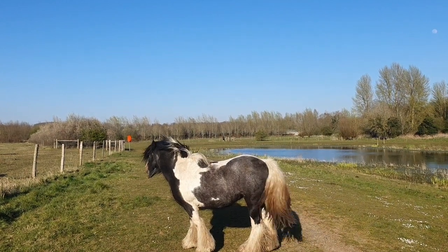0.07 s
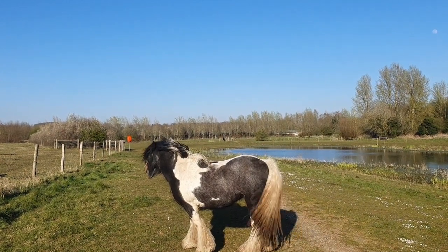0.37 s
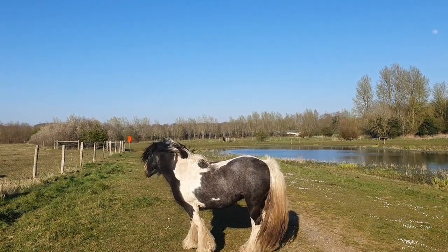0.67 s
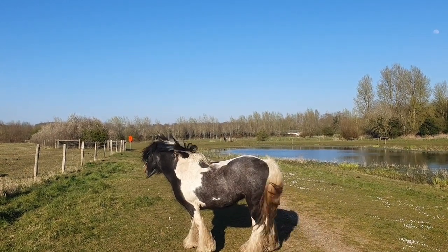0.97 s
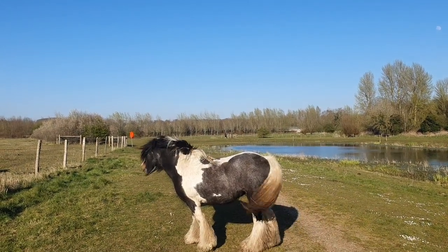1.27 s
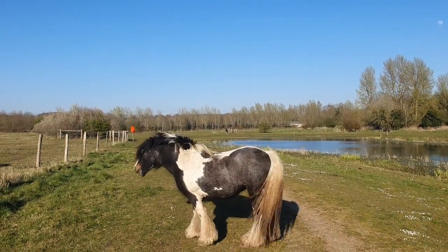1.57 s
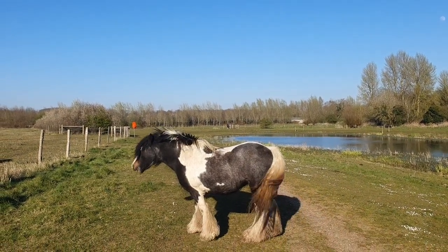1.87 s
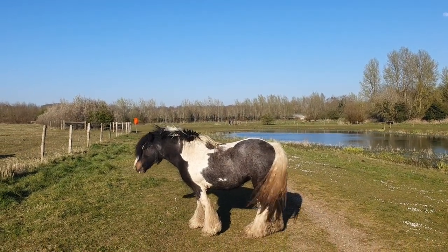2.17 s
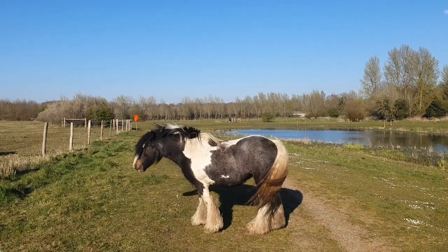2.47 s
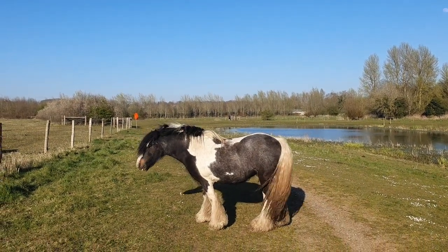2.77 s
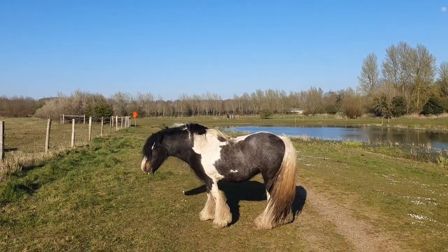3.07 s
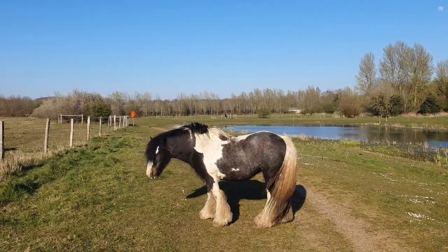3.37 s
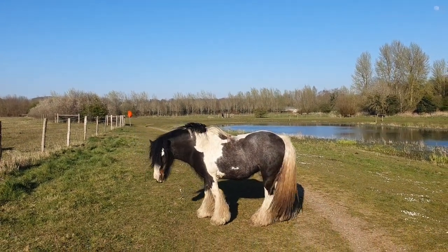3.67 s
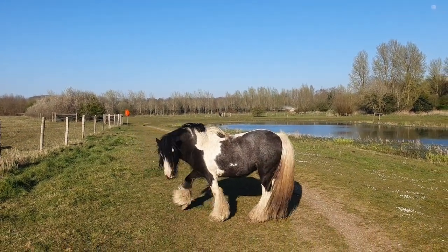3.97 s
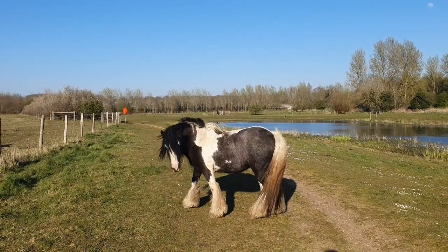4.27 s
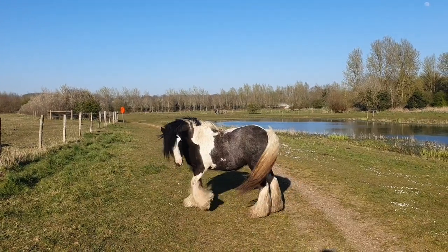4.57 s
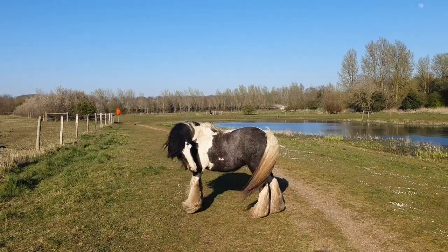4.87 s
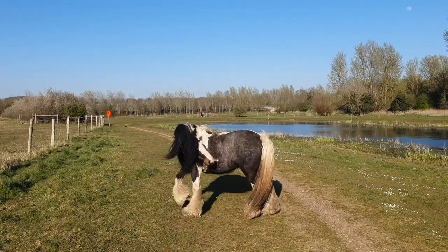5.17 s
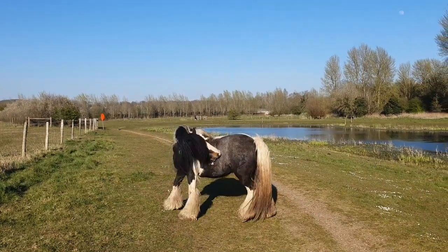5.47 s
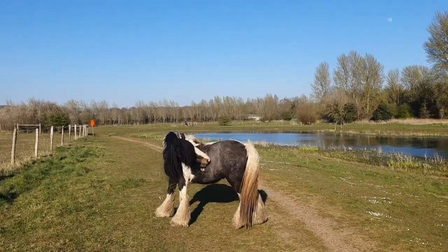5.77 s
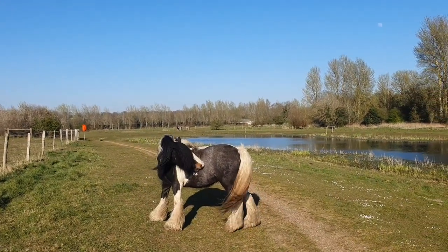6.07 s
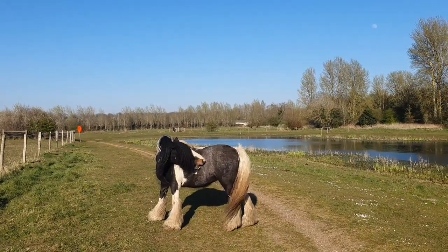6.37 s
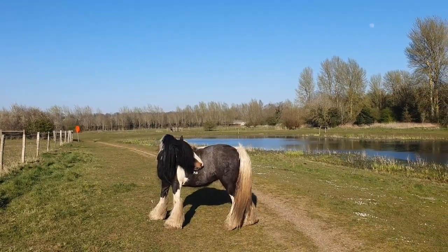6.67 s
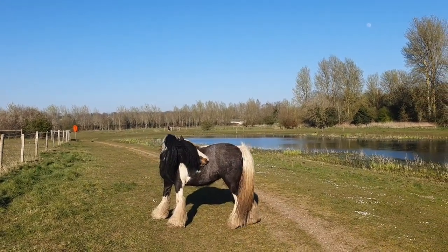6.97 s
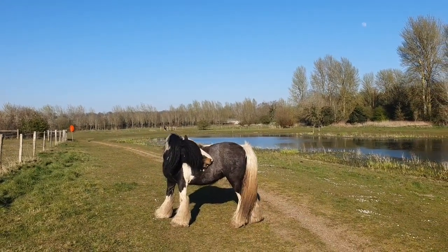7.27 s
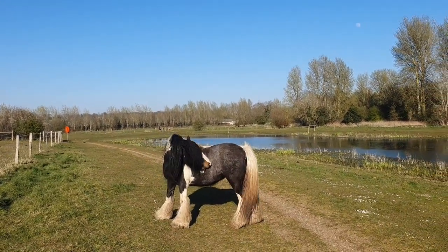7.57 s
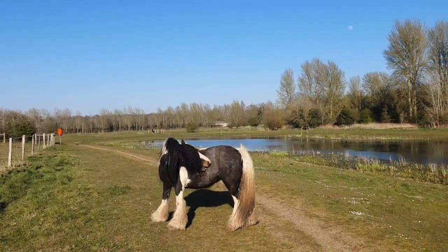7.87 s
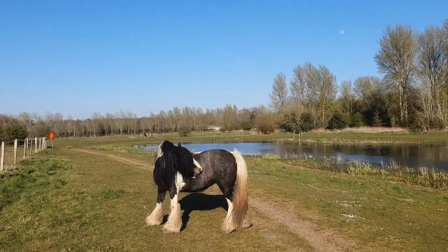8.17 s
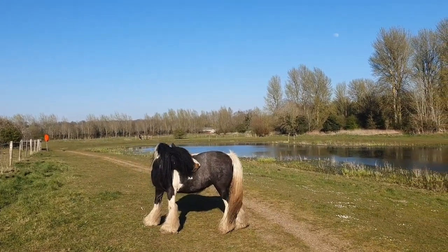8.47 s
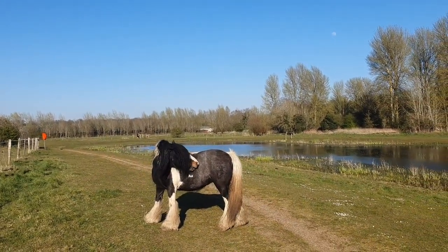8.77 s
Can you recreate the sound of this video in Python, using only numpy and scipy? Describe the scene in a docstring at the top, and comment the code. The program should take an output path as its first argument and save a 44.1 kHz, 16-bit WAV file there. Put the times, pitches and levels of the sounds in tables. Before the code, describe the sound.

Outdoors in an open field, a horse starts at once with two short nasal grunts under a wavering high cry. By 0.3 seconds it leaps to a thin, whistling squeal, then drops to a short rasp just before 1 second. Wind immediately hits the hand-held microphone with a cluster of loud thumps. Uneven gusts keep rumbling and flapping until about 7 seconds, with strong buffets near 1.9 and 5.4 seconds and a few dull crackles between 5 and 7 seconds. Far off, a small bird sings very faint runs of falling notes at the start and around 2.8, 3.7 and 6.4 seconds; another peeps near 3.3 and 8.4 seconds. The wind dies away by about 7.7 seconds. From there to the end at around 9 seconds, soft ticks and a light grass rustle sound close underfoot over the quiet hush of the field.

```python
"""Horse squeal and wind by a pond

On a path by a pond a horse grunts, breaks into a thin high squeal and drops back to a short rasp. Then gusts
ride on a breeze and buffet each port of the hand-held microphone; the hardest crackle. Far off a small bird
sings runs of falling notes, some closing on short steady low notes. Close by, grass rustles and ticks underfoot
over a quiet field."""
import sys
import numpy as np
from scipy import signal
from scipy.fft import rfft, irfft, next_fast_len
from scipy.io import wavfile
from scipy.ndimage import uniform_filter1d, map_coordinates

SR = 44100
rng = np.random.default_rng(int(sys.argv[2]) if len(sys.argv) > 2 else 0)


def bounce(signal):
    """Save signal as a 16-bit WAV file at the path given by the first command-line argument."""
    frames = np.transpose(np.atleast_2d(signal))
    limited = np.clip(frames, -1, 1)
    pcm = np.round(limited * 32767).astype(np.int16)
    wavfile.write(sys.argv[1], SR, pcm)


N = 397341
TIME = np.arange(N) / SR

# noise spectra of hollow roar, tearing air, dull knocks and dry grass: [f/Hz, relative level/dB]
ROAR_COLOUR = [(90, -16.5), (190, -4.5), (380, 1.5), (620, -5.5), (900, -25.5), (1800, -60.5)]
TEAR_COLOUR = [(450, 11.5), (850, 14.5), (1300, 2), (2000, -8.5), (3200, -21.5), (7500, -33),
               (10000, -58.5)]
KNOCK_COLOUR = [(1200, 9), (3000, -8), (7500, -35)]
GRASS_COLOUR = [(2900, -4.5), (3900, 3), (5000, -4.5), (13500, -8.5)]


def horse(lag_s=.00009, right_db=-1.5):
    """The horse's call reaches the left port a little sooner; ground and trees add a faint tail."""
    voice = grunt() + squeal()
    right = undb(right_db) * np.interp(TIME - lag_s, TIME, voice)
    return np.array([voice, right]) + outdoors(voice, echo_db=-20)


def squeal(overtone_db=-28, hiss_db=-10.5, leak_db=-19, flicker_db=6, linger_s=.058):
    """A high voice arches, then leaps to a whistle; where it sags the folds slacken and turn hoarse."""
    # pitch of the squeal: [t/s, f/Hz]
    melody = [(0.0, 1100), (0.04, 1380), (0.09, 790), (0.148, 1380), (0.2, 840), (0.23, 1380),
              (0.256, 2330), (0.285, 2730), (0.325, 2490), (0.365, 2600), (0.415, 2410), (0.484, 2375),
              (0.5, 2430), (0.526, 2400), (0.538, 2265), (0.572, 2260), (0.586, 2410), (0.62, 2480),
              (0.652, 2300), (0.692, 2340), (0.706, 2545), (0.748, 2460), (0.768, 2260), (0.798, 1600),
              (0.83, 2280), (0.852, 2350), (0.862, 2540), (0.884, 2500), (0.9, 2280), (0.922, 1560),
              (0.94, 1200)]
    # upper resonances of the head: [f/Hz, width/Hz, gain/dB]
    head = [(3940, 480, -5), (5000, 770, 3), (6150, 300, 8), (7180, 320, -2.5)]
    hz = uniform_filter1d(curve(melody), size=220)
    db = whistle_level(hz)
    # slack folds, weak drive and quick jumps (each 0 to 1) unsettle the voice
    slack = np.clip((2240 - hz) / 340, 0, 1)
    slack = np.maximum(slack, uniform_filter1d(slack, size=int(linger_s * SR)))
    weak = np.clip((-35 - db) / 14, 0, 1)
    jump = np.clip(np.abs(np.gradient(hz)) * SR / 24000, 0, 1) ** 2
    jitter = .004 + .02 * np.maximum(slack, np.maximum(weak, jump))
    phase = 2 * np.pi * np.cumsum(hz * (1 + jitter * walk(600))) / SR
    overtones = np.zeros(N)
    for k in range(2, 7):
        strength = undb(overtone_db + flicker_db * np.clip(walk(110), -2, 1)) * (2 / k) ** 2
        overtones += strength * np.sin(k * phase + .5 * walk(900))
    overtones *= undb(np.maximum(23 * slack, 17 * weak))
    hiss = noise([(1500, -11.5), (5500, 4), (9000, -21.5)])[0] * undb(hiss_db) * slack
    # the overtones flare as they glide through the resonances
    ringing = sum(undb(gain) * formant(overtones + hiss, f, width) for f, width, gain in head)
    upper = ringing + hiss / 2 + undb(leak_db) * overtones
    sounding = uniform_filter1d(1. * (TIME < melody[-1][0]), size=256)
    # uneven beats of the folds chop the whistle into a rasp
    chop = undb((3.2 * slack + 2 * weak + jump) * np.clip(walk(700), -2, 2))
    chop = uniform_filter1d(chop / running_rms(chop, SR // 40), size=20)
    shimmer_db = (3 + 4 * np.maximum(weak, jump / 2)) * np.clip(walk(150), -2, 1)
    return np.sqrt(2) * (np.sin(phase) + upper) * chop * undb(db + shimmer_db) * sounding


def whistle_level(hz, peak_hz=2314, peak_db=-22.5, below_hz=110, above_hz=75, start_db=-5, swell_s=.4):
    """Level in dB: the whistle swells in, peaks on its resonance, fades gently below and steeply above."""
    # a brief catch in the voice: [centre t/s, half-width/s, dip/dB]
    catch = (0.61, 0.015, -18.5)
    s, width, dip_db = catch
    dip = dip_db * np.exp(-((TIME - s) / width) ** 2)
    swell = start_db * np.clip(2 - 2 * TIME / swell_s, 0, 1)
    below = np.maximum(peak_hz - hz, 0) / below_hz
    above = np.maximum(hz - peak_hz, 0) / above_hz
    return peak_db + swell + dip - 10 * np.log10(1 + below ** 2) - 20 * np.log10(1 + above ** 2)


def grunt(jitter=.016, rasp=.6, restless_db=3, nose_db=-1):
    """A nasal hum; uneven, hoarse beats of the folds ring the throat."""
    # throat resonances, mouth open: [f/Hz, width/Hz, gain/dB]
    throat = [(744, 140, -3), (1433, 190, -2.5), (2206, 280, -5.5), (5300, 1500, -23)]
    hz, strength = grunt_contour()
    cycles = np.cumsum(hz * (1 + jitter * walk(220))) / SR
    pulses = unit(np.diff(np.floor(cycles), prepend=0) * undb(2 * walk(200)))
    breath = unit(np.exp(-(cycles % 1)) * rng.standard_normal(N))
    beats = pulses + rasp * breath
    mouth = sum(undb(db + restless_db * walk(37)) * formant(beats, f, width) for f, width, db in throat)
    nose = undb(nose_db) * unit(np.sin(2 * np.pi * cycles))
    return unit(nose + unit(mouth)) * strength


def grunt_contour(arch=.098, fullness=.65):
    """Pitch and strength of the low voice: both rise and fall with the effort of each grunt."""
    # grunts as the squeal starts and ends: [t/s, length/s, top f/Hz, level/dB]
    grunts = [(0.0, 0.095, 209.6, -42.5), (0.108, 0.11, 208, -34.5), (0.212, 0.029, 202.6, -31.5),
              (0.912, 0.056, 197.7, -33)]
    hz, strength = np.full(N, grunts[0][2], float), np.zeros(N)
    for s, length, top_hz, db in grunts:
        during = (TIME > s) & (TIME < s + length)
        effort = np.sin(np.pi * (TIME[during] - s) / length) ** fullness
        hz[during] = top_hz * (1 - arch * (1 - effort))
        strength[during] = undb(db) * effort
    return hz, strength


def wind(eddy_db=-15, eddy_growth=.45, calm_db=-65, tear_db=1, crackle_db=3, thinning_db=10):
    """Eddies rumble and flap at each port; the fastest tear into a crackle at the cost of the roar."""
    # spectrum of the rumble: [f/Hz, relative level/dB]
    eddy_colour = [(25, -24.5), (55, -2), (90, -3), (150, -9), (450, -33.5)]
    db, sharpness = wind_force()
    flaps = flapping()
    stirring = undb(eddy_growth * db + eddy_db) / np.hypot(1, undb(calm_db - db))
    rumble = noise(eddy_colour) * unit(flaps ** .5 * flutter(18, 6.15)) * stirring
    body = roar(db) * flaps * undb(db) / np.hypot(1, undb(sharpness + thinning_db))
    tearing = noise(TEAR_COLOUR) * unit(flaps * flutter(400, crackle_db)) * undb(db + sharpness + tear_db)
    return rumble + body + tearing


def wind_force(breeze_db=2, attack_s=.02, sag_db_per_s=10.5, release_s=.023):
    """Level and sharpness of the wind in dB: breeze and gusts add in power; a gust rises fast and sags."""
    # breeze between the gusts: [t/s, level/dB before breeze_db]
    breeze = [(0.93, -62), (1.1, -22.5), (1.45, -43), (1.6, -38), (1.94, -30.5), (3.05, -33.5), (3.3, -28),
              (4.5, -31), (4.8, -36.5), (5.08, -25), (5.5, -27.5), (5.83, -38.5), (6.07, -33), (7.0, -39),
              (7.16, -49.5), (7.66, -50), (7.8, -73), (8.02, -83.5), (8.06, -62)]
    # how much the breeze tears at the ports: [t/s, sharpness/dB relative to its level]
    sharpness = [(1.4, -35), (3.0, -17), (5.7, -18), (7.15, -3.5), (9.0, -27)]
    # gusts: [t/s, length/s, level/dB, sharpness/dB relative to that level]
    gusts = [(0.947, .175, -18, -20.5), (1.235, 0.26, -22, -47), (1.715, 0.15, -20, -22),
             (1.911, 0.046, -18.5, -24), (2.053, 0.17, -22.5, -20.5), (2.358, 0.28, -23, -23.5),
             (2.667, 0.12, -23, -16), (3.101, 0.2, -20.5, -17.5), (3.391, 0.3, -20.5, -15),
             (3.751, 0.87, -26, -11.5), (4.225, 0.21, -20.5, -16), (4.849, 0.19, -21, -24),
             (5.228, 0.1435, -17.5, -14), (5.262, 0.05, -24, -3.5), (5.479, 0.15, -22, -14),
             (5.932, 0.26, -22, -19.5), (6.372, 0.99, -32.5, -12), (6.921, 0.14, -22, -9.5),
             (7.39, 0.15, -32.5, -10)]
    power = undb(curve(breeze) + breeze_db) ** 2
    torn = power * undb(curve(sharpness)) ** 2
    for s, length, db, sharp_db in gusts:
        age = np.maximum(TIME - s, 0)
        shape = np.minimum(age / attack_s, 1) * np.exp(-np.maximum(age - length, 0) / release_s)
        gust = (shape * undb(db - sag_db_per_s * age)) ** 2
        power += gust
        torn += gust * undb(sharp_db) ** 2
    return 10 * np.log10(power), 10 * np.log10(torn / power)


def flapping(per_s=130, spread_db=7.5, decay_s=.0088):
    """Eddies strike each port at random, rise fast and die away: a gain of mean power 1."""
    hits = rng.random((2, N)) < per_s / SR
    strikes = hits * undb(spread_db * np.clip(rng.standard_normal((2, N)), -2, 1))
    decaying = signal.lfilter([1], [1, -np.exp(-1 / (decay_s * SR))], strikes)
    push = uniform_filter1d(decaying, size=SR // 600) + .15
    return push / running_rms(push, SR // 7)


def roar(db, swirl_octaves=.13, octaves_per_db=.02, usual_db=-22):
    """Hollow roar at the ports: its pitch wanders from eddy to eddy and rises with the wind's force."""
    speed = 2 ** (swirl_octaves * walk(25) + octaves_per_db * np.maximum(db - usual_db, -20))
    position = np.cumsum(speed)
    return np.array([map_coordinates(port, [position], mode="mirror") for port in noise(ROAR_COLOUR)])


def buffets(rise_s=.002, edge_db=-20, wake_db=-15, wake_s=.013):
    """A strong eddy hits the ports out of step: a rough-edged thump, then a wake of smaller eddies."""
    # thumps on the microphone: [t/s, peak/dB, f/Hz]
    thumps = [(0.96, -4, 200), (1.031, -6, 365), (1.066, -8, 511), (1.085, -5, 470), (1.115, -8, 480),
              (1.248, -13, 354), (1.292, -10.5, 140), (1.807, -7.5, 485), (1.935, -6, 585),
              (2.711, -13.5, 275), (2.77, -9, 370), (3.252, -8.5, 390), (4.383, -8, 474), (4.894, -9, 354),
              (5.243, -10.5, 511), (5.36, -3, 402), (5.529, -12, 404), (5.587, -11.5, 520),
              (5.959, -10, 404), (6.155, -8.5, 343), (6.969, -12.5, 398)]
    out, wake, t = np.zeros((2, N)), np.zeros(N), TIME[:SR // 20]
    edge = undb(edge_db) * noise(TEAR_COLOUR)
    push = (t / rise_s * np.exp(1 - t / rise_s)) ** 2
    for s, db, hz in thumps:
        port_phases = np.array([[0], [rng.uniform(-1.94, 2)]])
        swing = np.sin(2 * np.pi * hz * t + port_phases)
        start = int(s * SR)
        add(out, s, undb(db) * push * (swing + edge[:, start:start + len(t)]))
        add(wake, s + rise_s, undb(db + wake_db) * np.exp(-t / wake_s))
    return out + noise(ROAR_COLOUR, wake)


def cracks(decay_s=.004):
    """The hardest gusts snap at one port or the other: short, dull crunches."""
    # wind cracks: [t/s, level/dB, left minus right/dB]
    snaps = [(5.288, -28, -19), (5.383, -28.5, -9), (5.615, -32, 8), (6.118, -31.5, -8.5),
             (6.824, -31, -16), (6.866, -30.5, -16)]
    bursts, fade = np.zeros((2, N)), np.exp(-TIME[:SR // 20] / decay_s)
    for s, db, pan_db in snaps:
        balance = unit(undb([[pan_db], [0]]))
        add(bursts, s, balance * undb(db) * fade)
    return noise(KNOCK_COLOUR, bursts)


def ticks(decay_s=.003, body_db=-5):
    """Stalks and grit snap underfoot: a dull knock with a bright top."""
    # snaps: [t/s, level/dB before body_db, treble/dB relative to that level]
    snaps = [(7.792, -56, 4.5), (8.0369, -34.5, -22.5), (8.3988, -37, -21), (8.701, -47.5, -6),
             (8.734, -40.5, -10), (8.749, -42, -10), (8.779, -41, -13)]
    knock, top, fade = np.zeros(N), np.zeros(N), np.exp(-TIME[:SR // 20] / decay_s)
    for s, db, treble_db in snaps:
        add(knock, s, undb(db + body_db) * fade)
        add(top, s, undb(db + treble_db) * fade)
    return noise(KNOCK_COLOUR, knock) + noise(GRASS_COLOUR, top)


def far_bird():
    """A bird far off, wavering in the wind and smeared by the trees."""
    songs = songbird() + steady_notes()
    return songs * flutter(200, 4.8) + outdoors(songs, echo_db=-2.5)


def songbird(start_hz=6800, sink_hz=130, floor_hz=3750, glide_s=.055, note_s=.047, stretch_s=.006):
    """Each song gathers strength; every note slides down and fades, lower and longer than the last."""
    # songs: [t/s, number of notes, level/dB that the notes grow towards]
    songs = [(0.118, 6, -61), (2.798, 5, -62.5), (3.72, 5, -58.5), (6.384, 7, -65)]
    # note onsets of the slowing phrase: [t/s after its start]
    phrase = [0, .083, .163, .252, .353, .495, .678]
    out = np.zeros(N)
    for s, notes, db in songs:
        for k, after_s in enumerate(phrase[:round(notes)]):
            length = note_s + k * stretch_s
            t = TIME[:int(length * SR)]
            hz = floor_hz + (start_hz - k * sink_hz - floor_hz) * np.exp(-t / glide_s)
            swell = undb(db - 7 / (1 + k)) * np.sin(np.pi * np.sqrt(t / length)) ** 2
            add(out, s + after_s, swell * np.sin(2 * np.pi * np.cumsum(hz) / SR))
    return out


def steady_notes():
    """Further notes of the singing bird, short and of steady pitch: low closing notes and a lone call."""
    # steady notes: [t/s, length/s, f/Hz, level/dB]
    notes = [(3.208, 0.037, 4290, -60.5), (3.362, 0.037, 4210, -59), (8.407, 0.054, 3560, -61)]
    out = np.zeros(N)
    for s, length, hz, db in notes:
        t = TIME[:int(length * SR)]
        add(out, s, undb(db) * np.sin(np.pi * t / length) * np.sin(2 * np.pi * hz * t))
    return out


def field(air_db=-60, swish_db=3):
    """Distant open-air murmur, and nearer swishes that swell and fade."""
    # swishes, as of long hair or grass brushing: [centre t/s, half-width/s, level/dB before swish_db]
    swishes = [(1.2, 0.15, -62), (1.752, 0.19, -63), (4.663, 0.066, -64.5), (7.683, 0.17, -69.5),
               (8.853, 0.15, -67.5)]
    # spectrum of the murmur: [f/Hz, relative level/dB]
    air_colour = [(250, -19.5), (850, 9.5), (2100, -3.5), (3900, -9.5), (7500, -15.5), (11000, -29.5)]
    brushing = sum(undb(db + swish_db) * np.exp(-((TIME - s) / width) ** 2) for s, width, db in swishes)
    rustle = noise(GRASS_COLOUR) * flutter(220, 1.2) * brushing
    return rustle + noise(air_colour) * flutter(15, 1) * undb(air_db)


def outdoors(x, echo_db, t60_s=.37):
    """What ground and trees scatter back to the two ports."""
    t = TIME[:SR // 2]
    scatter = rng.standard_normal((2, len(t))) * undb(-60 * t / t60_s)
    scatter /= np.linalg.norm(scatter[0])
    return undb(echo_db) * signal.fftconvolve(x[None], scatter, axes=1)[:, :N]


def formant(x, hz, width):
    """A steep resonance: shift down by hz, low-pass, shift back."""
    carrier = np.exp(2j * np.pi * hz * TIME)
    lowpass = signal.bessel(2, width / 2, norm="mag", fs=SR, output="sos")
    return 2 * np.real(carrier * signal.sosfilt(lowpass, x / carrier))


def noise(colour, envelope=1):
    """Unrelated noise of one colour at the two ports, as strong as the envelope."""
    white = envelope * rng.standard_normal((2, N))
    size = next_fast_len(N)
    hz, db = np.transpose(colour)
    f = np.arange(size // 2 + 1) * SR / size + 1
    skirts = np.minimum(f / hz[0], 1) * np.minimum(hz[-1] / f, 1) ** 2
    gain = undb(np.interp(np.log(f), np.log(hz), db)) * skirts
    return irfft(rfft(white, size) * unit(gain), size)[:, :N]


def flutter(rate, depth_db):
    """A wavering gain of mean power 1 for each port."""
    return unit(undb(depth_db * np.clip([walk(rate), walk(rate)], -2, 2)))


def walk(rate):
    """Smooth random drift of rms 1 that changes about rate times a second."""
    hold = int(SR / rate)
    steps = np.repeat(rng.standard_normal(N // hold + 1), hold)[:N]
    return unit(uniform_filter1d(steps, hold))


def curve(rows):
    """Points in time joined by straight lines."""
    return np.interp(TIME, *np.transpose(rows))


def add(out, s, sound):
    """Mix a short sound in at time s."""
    i = int(s * SR)
    out[..., i:i + sound.shape[-1]] += sound[..., :N - i]


def undb(db):
    return 10 ** (np.asarray(db) / 20)


def unit(x):
    """Scaled to rms 1."""
    return x / np.sqrt(np.mean(x ** 2))


def running_rms(x, samples):
    return np.sqrt(uniform_filter1d(x ** 2, samples))


def scene():
    """All that reaches the two ports on the path."""
    return horse() + wind() + buffets() + cracks() + ticks() + far_bird() + field()


def record(dry, ceiling=.9, top_hz=14500):
    """The microphone rounds the hardest thumps and cuts the top."""
    rounded = ceiling * np.tanh(dry / ceiling)
    return signal.sosfilt(signal.ellip(10, .2, 80, top_hz, fs=SR, output="sos"), rounded)


dry = scene()
out = record(dry)
bounce(out)
```